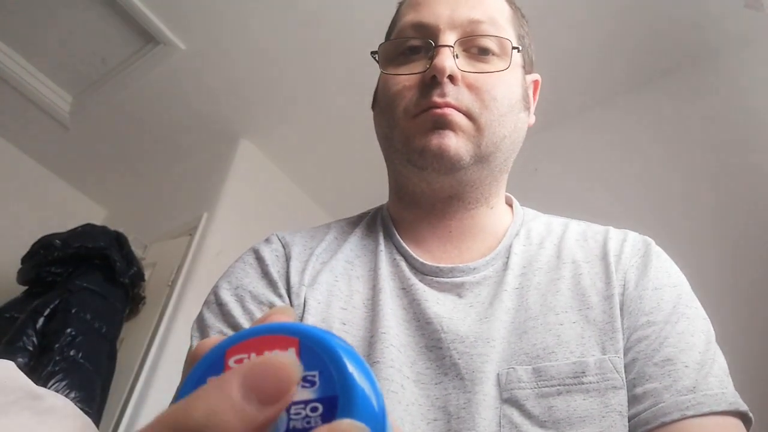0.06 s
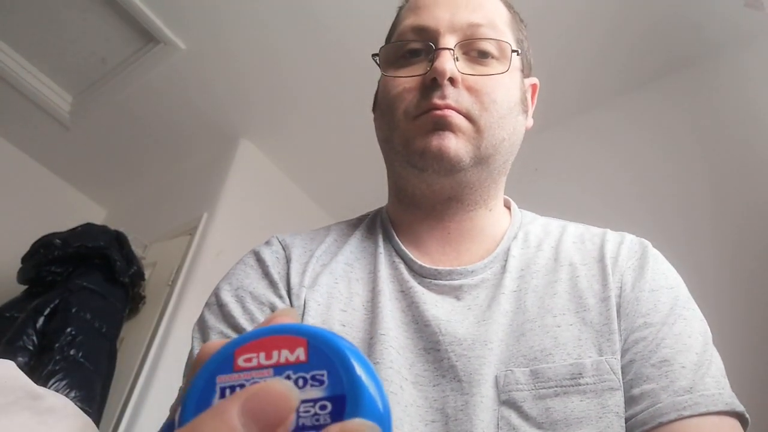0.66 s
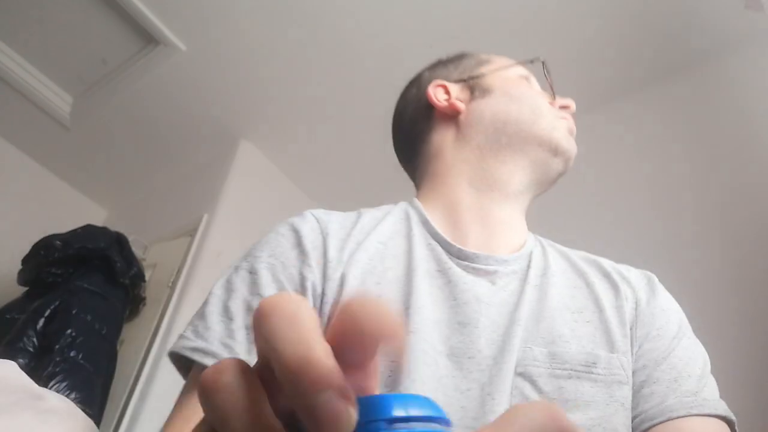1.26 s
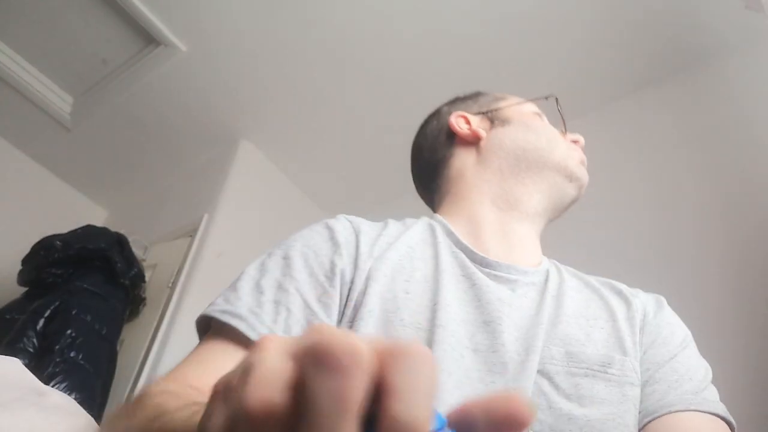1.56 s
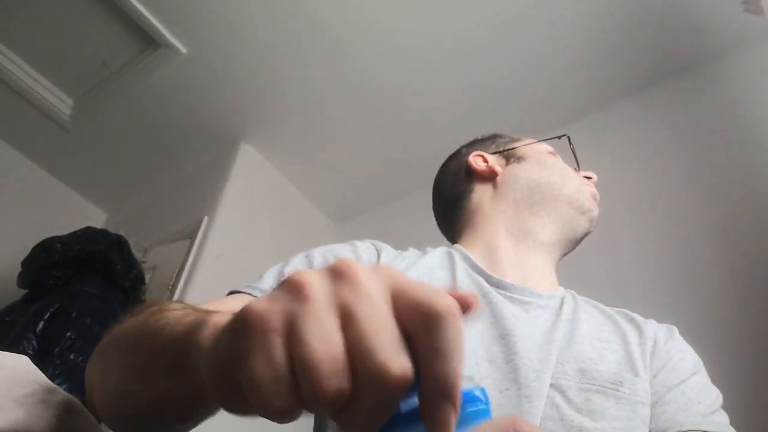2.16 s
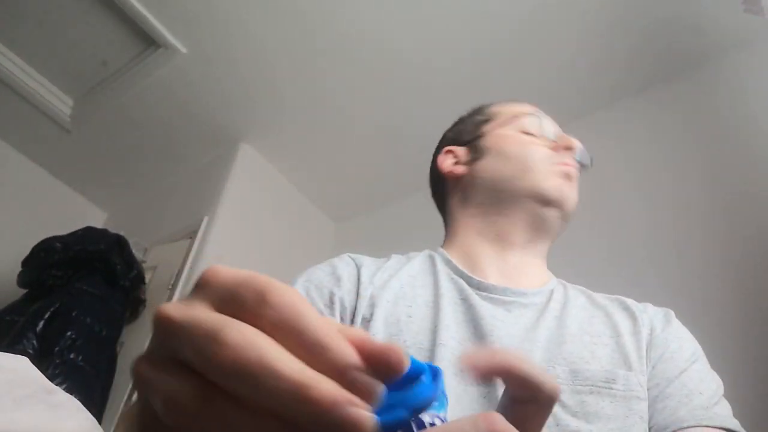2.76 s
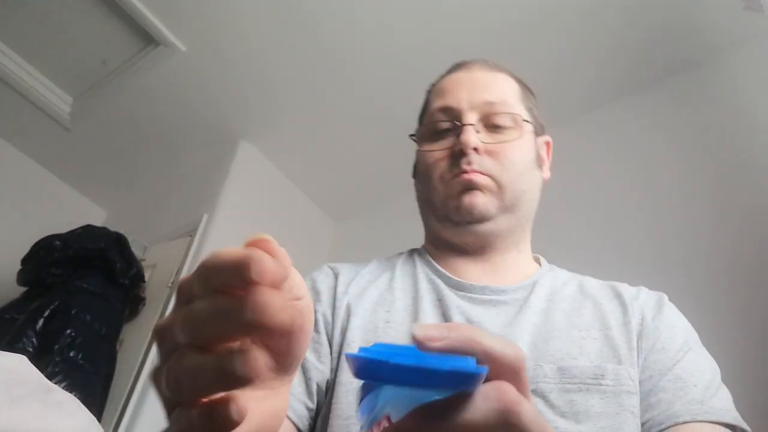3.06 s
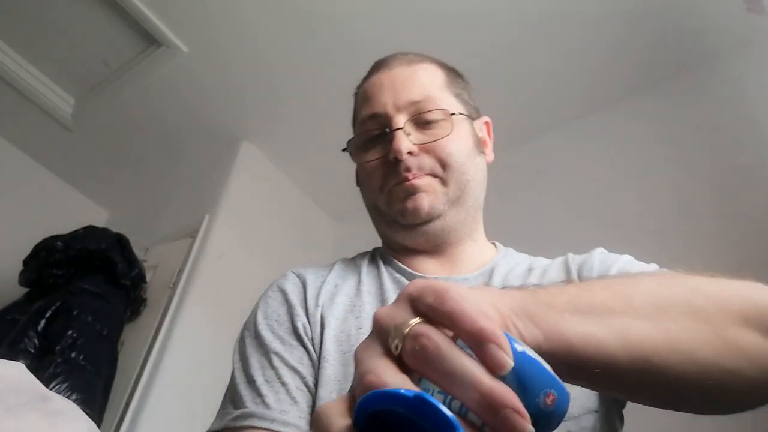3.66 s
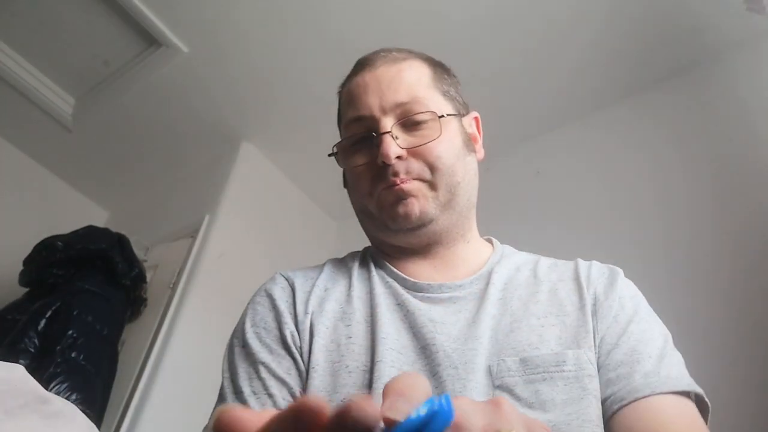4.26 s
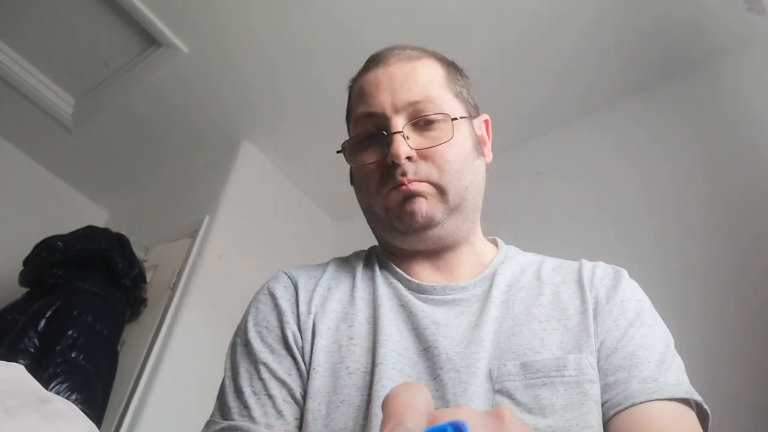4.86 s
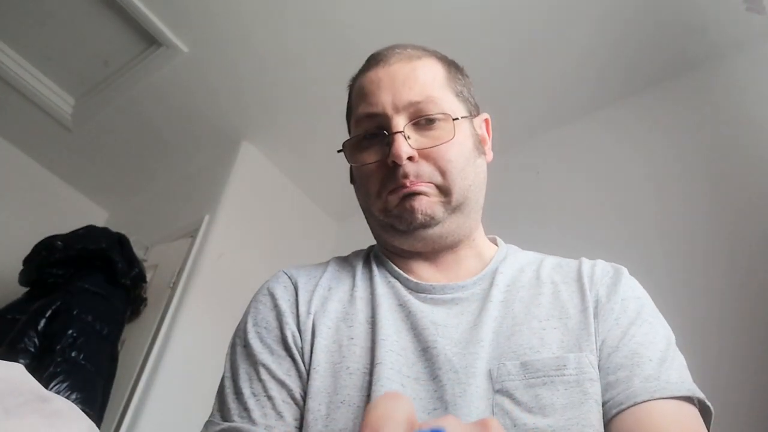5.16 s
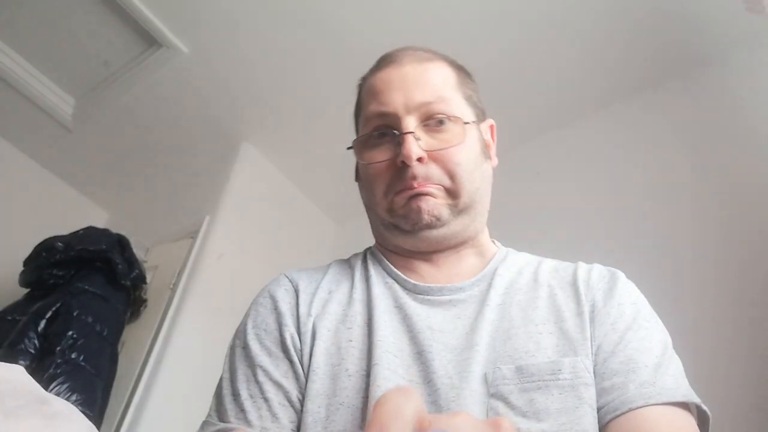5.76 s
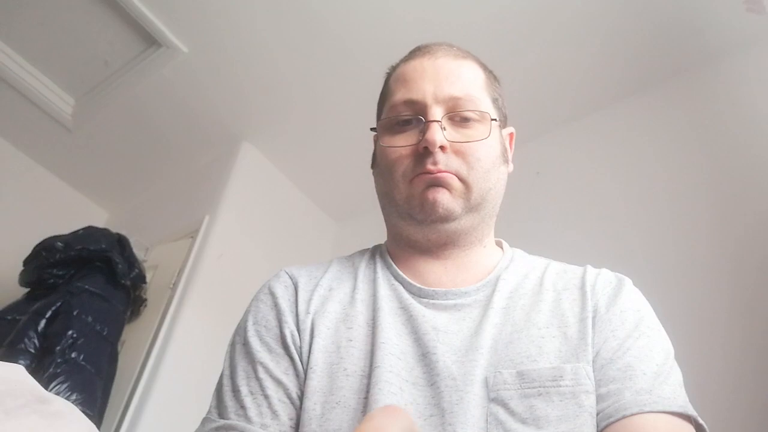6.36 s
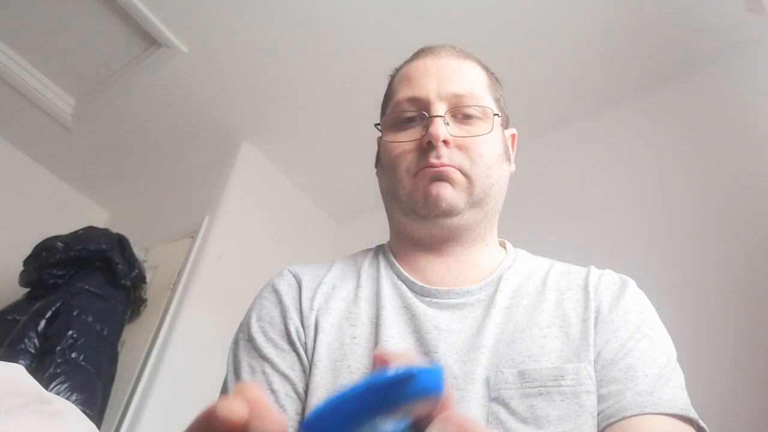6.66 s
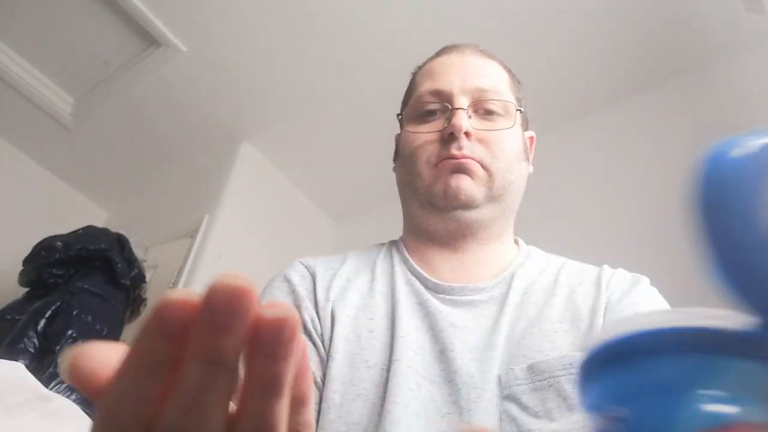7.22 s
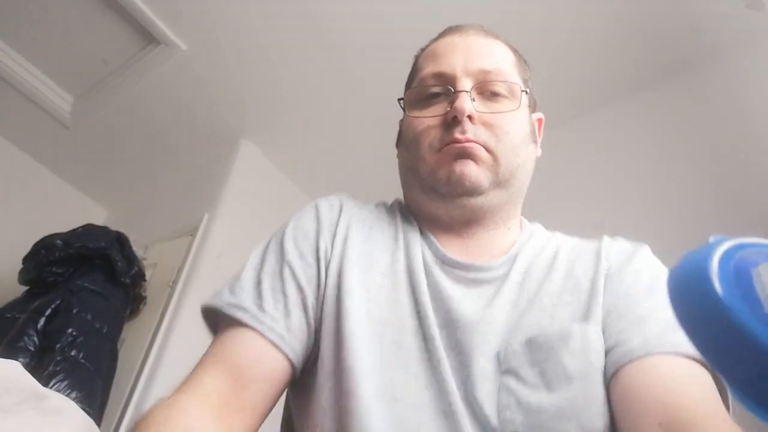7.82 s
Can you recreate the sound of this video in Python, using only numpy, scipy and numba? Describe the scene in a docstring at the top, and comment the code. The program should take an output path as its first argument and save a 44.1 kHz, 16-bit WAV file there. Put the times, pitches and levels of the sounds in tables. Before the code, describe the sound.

A small plastic bottle rustles and clicks in someone's hands, then its lid snaps open with one crisp crack. Soft rubbing and scattered ticks follow as pellets slide toward a palm held over the opening. Near the end they tumble back with a busier, louder, hollow rattle. Everything is heard up close in a quiet room with hardly any echo, over faint hiss and a little sleeve swish.

```python
"""Handling a plastic bottle of pellets

Close to the microphone in a quiet, dry room, fingers scrape over a small bottle and the flip lid pops.
Pellets slide and click as it is tipped against a palm and righted; a sleeve brushes along.
Every touch rings the plastic wall and the air inside, whose pitch drops as the hand covers the mouth."""
import sys
import numpy as np
from scipy import signal
from scipy.fft import rfft, irfft, next_fast_len
from scipy.io import wavfile
from numba import njit

SR = 44100
rng = np.random.default_rng(int(sys.argv[2]) if len(sys.argv) > 2 else 0)


def wav_out(sig):
    """Save sig, one row per channel (or a flat mono array), as 16-bit PCM at SR to the path in sys.argv[1]."""
    wavfile.write(sys.argv[1], SR, np.round(np.clip(np.atleast_2d(sig).T, -1, 1) * 32767).astype(np.int16))


N = 347949
TIME = np.arange(N) / SR
LID_OPEN_S, HALF_COVERED_HZ = 2.1628, 680

# plastic wall: pitch_hz, width_hz, gain_db
WALL_MODES = [(997, 345, 2), (1326, 210, -1), (1740, 640, -1.5), (2020, 230, 1), (2590, 350, 2),
              (3116, 600, 0.5), (3530, 250, -3)]
# bright modes that only hard edges reach: pitch_hz, width_hz, gain_db
EDGE_MODES = [(5140, 910, 2.5), (5890, 310, 0.5), (6454, 230, 4), (7100, 570, 2.5), (8060, 280, -3.5),
              (9400, 560, -13), (13400, 3900, -46)]
# pellet and finger hits, before trim: start_s, air_db, wall_db, wall_tilt_db_per_octave, edge_db
HITS = [(0.177, -69.5, -66.5, -4, -73), (0.5541, -70, -68, -15, -72), (1.0499, -59, -45, 6, -47),
        (1.1367, -41, -32, -16, -39.5), (1.1454, -37.5, -40, -5, -53), (1.3682, -44, -43, 9, -38),
        (1.3838, -50, -36.5, 11, -40), (1.4419, -72, -42.5, -0.5, -43.5), (1.6436, -42.5, -40, 14, -32),
        (2.6889, -53.5, -63.5, 4, -55), (2.8497, -45, -40.5, -4, -46), (2.9539, -62, -56, -1, -45.5),
        (3.0791, -52.5, -49, 11, -44.5), (3.2147, -50, -44.5, 7, -44), (3.2408, -58, -57, 6, -45.5),
        (3.384, -59, -55.5, 5, -55), (3.6704, -56, -55, 14, -36.5), (3.8498, -51.5, -40.5, -3, -50),
        (3.9325, -55, -44, 0, -47.5), (4.226, -44, -36.5, -13, -40.5), (4.3048, -39.5, -34, -22, -47),
        (4.3632, -37, -40.5, -4, -39.5), (4.3832, -36, -32, -6.5, -49), (4.6757, -65, -60, 18, -45),
        (4.941, -52, -49, 6, -44), (5.239, -60, -51, 5, -46.5), (5.312, -65, -47.5, 12, -43),
        (5.6448, -79, -67, 12, -52), (5.8786, -45.5, -45, -0.5, -51), (5.9315, -40, -37, -9, -50),
        (5.9839, -39, -45, 18, -51), (6.1456, -35, -33, -2, -44), (6.1766, -35, -46, 21, -47),
        (6.2091, -37.5, -39.5, 1, -46.5), (6.3154, -54, -47, 0.5, -72), (6.4642, -24, -24, 1, -37),
        (6.5004, -40, -40, -3, -62), (6.6466, -26.5, -30.5, -4.5, -46.5), (6.6676, -35, -35, -3.5, -48),
        (6.7127, -38, -28, -8, -44), (6.8285, -40.5, -35, 0, -48), (6.9191, -49, -43, -8, -58),
        (6.9776, -54, -38, -10, -48), (7.0001, -48, -36.5, -3, -45), (7.0735, -50, -38, -9, -51),
        (7.0087, -37, -32, -8, -44), (7.124, -39.5, -31, -7, -35), (7.1367, -48, -39, -3, -33.5),
        (7.1595, -59, -53, 12, -34.5), (7.1808, -29.5, -21.5, -12, -33), (7.2272, -42, -41, -6, -60),
        (7.2394, -42.5, -36.5, 19, -45), (7.2863, -33, -37, 0.5, -38.5), (7.3831, -43, -37, 25, -35),
        (7.4045, -60, -40.5, 20, -38), (7.8035, -52.5, -47.5, 10, -52), (7.8312, -76, -66, 11, -39)]
def clicks(air_trim_db, wall_trim_db, edge_trim_db):
    """Each hit rings the air inside, the wall and the bright modes; levels refer to its first 6 ms."""
    out = np.zeros((2, N + SR))
    t = np.arange(SR // 12) / SR
    attack = t < .006
    for start_s, air_db, wall_db, tilt_db, edge_db in HITS + finger_ticks():
        hz, width_hz = cavity_mode(start_s + t)
        air = air_ring(1. * (t == 0), hz, width_hz) * np.ones((2, 1))
        wall = strike(WALL_MODES, t, tilt_db, scuff_db=-16.5, scuff_s=0.0012,
                      chatter_db=-34, chatter_s=0.0065, vary_db=5)
        edge = strike(EDGE_MODES, t, 0, scuff_db=-1, scuff_s=0.0018,
                      chatter_db=-14.5, chatter_s=0.0096, vary_db=0)
        layers = ((band(air, 495, 1670), air_db + air_trim_db),
                  (band(wall, 756, 4200), wall_db + wall_trim_db),
                  (band(edge, 3580, 15000), edge_db + edge_trim_db))
        click = sum(from_db(db) * x / np.std(x[:, attack], axis=1)[:, None] for x, db in layers)
        start = int(start_s * SR)
        out[:, start:start + len(t)] += bottle_pan(start_s) * click
    return out[:, :N]


def finger_ticks(rate_per_s=5.9, wall_db=-73, spread_db=3):
    """Gripping fingers tick faintly at random; rows as in HITS."""
    gaps, strengths = rng.random((200, 2)).T
    starts_s = np.cumsum(.3 + 1.4 * gaps) / rate_per_s
    levels_db = wall_db + spread_db * (2 * strengths - 1)
    return [(s, db - 3, db, 0, db - 0.5) for s, db in zip(starts_s, levels_db) if s < N / SR]


def strike(modes, t, tilt_db_per_octave, scuff_db, scuff_s, chatter_db, chatter_s, vary_db):
    """An impulse, a brief scuff and fading chatter drive a set of modes."""
    scuff = from_db(scuff_db) * np.exp(-t / scuff_s)
    chatter = from_db(chatter_db) * np.exp(-t / chatter_s)
    force = rng.standard_normal(len(t)) * (scuff + chatter)
    force[0] = 1
    out = 0
    for hz, width_hz, db in modes:
        tilt_db = tilt_db_per_octave * np.log2(hz / modes[0][0])
        gain = from_db(db + tilt_db + vary_db * rng.standard_normal((2, 1)))
        ring = resonate(force, hz, width_hz) * gain * rng.choice([-1, 1])
        if hz > 1400:   # short waves reach the two sides in any phase
            ring[1] *= rng.choice([-1, 1])
        out = out + ring
    return out


# fineness of the friction: time_s, slips_per_s
SLIP_DENSITY = [(1.2, 980), (1.5, 370), (3.3, 295), (3.62, 2300), (3.82, 1870), (4.0, 650), (6.0, 364),
                (7.0, 740)]
# finger strokes and pellet slides, before trim: peak_s, rise_s, hold_s, air_db, wall_db, edge_db
RUBS = [(1.085, 0.039, 0.016, -48, -43.5, -48), (1.155, .03, 0.054, -44.5, -40, -43.5),
        (1.28, .06, 0.021, -51, -45.5, -56), (1.375, 0.06, 0.033, -50, -45, -50),
        (1.47, 0.07, 0.096, -64, -56.5, -65), (1.647, 0.057, 0.011, -47, -42.5, -49),
        (2.803, 0.023, 0.0064, -69, -62.5, -50), (2.849, 0.022, 0.0074, -44.5, -40, -47),
        (2.92, 0.017, 0.13, -67, -66, -65), (3.078, 0.018, 0.022, -53.5, -53, -55.5),
        (3.235, 0.046, 0.035, -57, -58, -59), (3.44, 0.03, 0.043, -58.5, -52.5, -56),
        (3.512, 0.013, 0.0075, -59, -56.5, -46), (3.64, 0.067, 0.21, -54, -45, -45),
        (3.9, 0.089, 0.17, -65, -59.5, -59), (4.215, 0.074, 0.063, -52, -51, -51.5),
        (4.31, 0.024, 0.084, -42, -47, -49.5), (4.68, 0.061, 0.031, -62, -66, -55),
        (4.94, 0.066, 0.017, -50, -54, -57), (5.19, 0.095, 0.015, -59.5, -63, -53.5),
        (5.25, 0.022, 0.017, -56, -61, -58), (5.31, 0.023, 0.0064, -57.5, -59, -48),
        (5.887, 0.015, 0.1, -52, -53, -54), (6.14, 0.09, .11, -46, -48.5, -53.5),
        (6.475, 0.026, 0.033, -51, -51.5, -53.5), (6.665, 0.14, 0.056, -45, -43, -50),
        (6.77, 0.14, .16, -47.5, -48, -53), (7.005, 0.082, 0.083, -44, -44.5, -48),
        (7.132, 0.021, 0.058, -41, -41, -42), (7.29, 0.016, 0.011, -49, -49, -52),
        (7.388, 0.03, 0.022, -49, -47.5, -46.5)]
def rubbing(air_trim_db, wall_trim_db, edge_trim_db):
    """Fingers and sliding pellets feed a stream of slips into the air, wall and bright modes."""
    air_gain, wall_gain, edge_gain = swells(RUBS, release_s=0.056)
    hz, width_hz = cavity_mode(TIME)
    slips = slip_envelope(curve(SLIP_DENSITY)[0], spread_db=5.5, decay_s=0.00084)
    force = slips * rng.standard_normal(N) * air_gain * from_db(air_trim_db)
    # the second air mode grows as the mouth is uncovered
    overtone_gain = from_db(-12 + 24 * np.log2(hz / HALF_COVERED_HZ))
    rings = air_ring(force, hz, width_hz) + overtone_gain * air_ring(force, 2.38 * hz, 2 * width_hz)
    air = band(rings, 281, 2530) * np.sqrt(4 * np.pi / SR)
    wall = wall_gain * unit_rms(band(rub_modes(WALL_MODES, slips, skin_db=-15.5), 620, 4520))
    edge = edge_gain * unit_rms(band(rub_modes(EDGE_MODES, slips, skin_db=-22.5), 3700, 15500))
    return (air + from_db(wall_trim_db) * wall + from_db(edge_trim_db) * edge) * bottle_pan(TIME)


def rub_modes(modes, slips, skin_db):
    """The same slips reach each mode with a strength of their own, over fine skin friction."""
    out = 0
    for hz, width_hz, db in modes:
        force = (slips + from_db(skin_db)) * rng.standard_normal((2, N))
        correlation = np.clip(1.1 - hz / 2200, 0, 1)   # long waves reach both sides alike
        force[1] = correlation * force[0] + np.sqrt(1 - correlation ** 2) * force[1]
        out = out + from_db(db) * resonate(force, hz, width_hz)
    return out


# air resonance, lower as the hand covers the mouth: time_s, pitch_hz
AIR_PITCH = [(1.7, 820), (2.75, 914), (3.33, 946), (3.44, 826), (3.63, 407), (3.85, 382), (4.0, 473),
             (4.24, 600), (4.34, 667), (4.7, 680), (5.35, 679), (5.88, 749), (6.2, 706), (6.48, 728),
             (6.66, 775), (6.85, 843), (7.2, 905), (7.8, 854)]
def cavity_mode(t, radiation_width_hz=16.6, palm_width_hz=19.7, shut_width_hz=410):
    """Pitch and width of the air mode: an open mouth radiates, a palm absorbs, a shut lid damps most."""
    hz, = curve(AIR_PITCH, t)
    openness = (hz / HALF_COVERED_HZ) ** 4.87
    width_hz = radiation_width_hz * openness + palm_width_hz / openness
    return hz, np.where(t < LID_OPEN_S, shut_width_hz, width_hz)


@njit
def air_ring(force, hz, width_hz):
    """A moving resonance whose output power does not depend on its width."""
    out, state = np.zeros(len(force)), 0j
    for i in range(len(force)):
        pole = np.exp((-width_hz[i] + 2j * hz[i]) * np.pi / SR)
        state = state * pole + force[i] * np.sqrt(width_hz[i])
        out[i] = state.real
    return out


# bottle position: time_s, left_over_right_db
BALANCE = [(0.2, 1), (1.1, -5), (2.9, -4.5), (3.75, -6.5), (4.3, -3.5), (4.9, 3), (6.1, 5.5), (7.1, 3),
           (7.17, 0), (7.4, -3.5), (7.85, -3)]
def bottle_pan(t):
    """Stereo gains follow where the bottle is held."""
    return pan(curve(BALANCE, t)[0])


# lid crack and scrape: frequency_hz, density_db
LID_SPECTRUM = [(200, -20), (400, -12), (620, 4.5), (1100, -3.5), (1700, 1), (2700, -4.5), (3400, -2),
                (4100, -11.5), (5500, -1), (7500, -8), (11000, -20.5), (16000, -27)]
def lid(pulse_s=0.0003, thump_hz=200, flip_s=2.176, rise_s=0.0043, fall_s=0.013):
    """The catch lets go with a push-pull of air, a thump and a crack; the lid scrapes and rings the air."""
    u = np.clip((TIME - LID_OPEN_S) / pulse_s, -20, 20)
    pop = -from_db(-26) * u * np.exp((1 - u * u) / 2)
    age_s = np.maximum(TIME - LID_OPEN_S, 0)
    thump = -from_db(-39.5) * np.sin(2 * np.pi * thump_hz * age_s) * np.exp(-age_s / 0.0094)
    crack = from_db(-28.5) * (TIME > LID_OPEN_S - pulse_s) * np.exp(-age_s / 0.0019)
    flip_fade = np.maximum((flip_s - TIME) / rise_s, (TIME - flip_s) / fall_s)
    flip = from_db(-32.5) * np.exp(-flip_fade) * (TIME > LID_OPEN_S)
    scrape = (crack + flip) * noise(LID_SPECTRUM, correlation=0.29)
    ring = from_db(1) * resonate(scrape.mean(axis=0), hz=758, width_hz=18)
    return (pop + thump + scrape + ring) * pan(left_db=-3)


def palm(start_s=3.558, rise_s=0.0034, pitch_hz=217, level_db=-55.5):
    """The palm seals the mouth with a soft, low bump."""
    u = np.clip((TIME - start_s) / rise_s, 0, 20)
    return from_db(level_db) * u * np.exp(1 - u) * np.sin(2 * np.pi * pitch_hz * (TIME - start_s))


# cloth swish: frequency_hz, density_db
SLEEVE_SPECTRUM = [(1000, -35), (3000, -15), (4200, -18), (5400, -7.5), (6500, -10), (7800, -2),
                   (9500, -19.5), (15000, -26)]
# sleeve strokes: peak_s, rise_s, hold_s, level_db
BRUSHES = [(1.81, 0.075, .02, -64.5), (2.61, 0.41, 0.15, -69), (7.54, 0.064, 0.14, -66.5)]
def sleeve():
    """A sleeve brushes along in swells of grainy hiss."""
    slips = slip_envelope(rate_per_s=160, spread_db=1, decay_s=0.0085)
    return swells(BRUSHES, release_s=0.12) * slips * noise(SLEEVE_SPECTRUM, correlation=0.039)


# low rumble: frequency_hz, density_db
RUMBLE_SPECTRUM = [(12, -0.5), (23, 3.5), (36, -8.5), (50, -4.5), (70, -12.5), (120, -10), (200, -22.5),
                   (350, -29), (900, -63.5)]
# hiss: frequency_hz, density_db
HISS_SPECTRUM = [(200, 4), (700, 4), (1500, 0), (3200, -3), (4000, -8), (5500, -3), (7500, -5),
                 (10000, -10), (13000, -10), (14900, -6), (15900, -13)]
# noise floor: time_s, rumble_db, hiss_db
FLOOR_LEVELS = [(0, -68.5, -79), (2.4, -68.5, -77.5), (4.5, -67, -76.5), (4.62, -59, -73),
                (5.5, -54.5, -70), (6.3, -56, -68.5), (6.8, -59.5, -63.5), (7.4, -62, -64.5),
                (7.6, -54, -64), (7.89, -53.5, -66)]
def background():
    """Faint rumble and hiss, louder in the second half."""
    rumble_db, hiss_db = curve(FLOOR_LEVELS)
    rumble = from_db(rumble_db) * noise(RUMBLE_SPECTRUM, correlation=0.78)
    hiss = from_db(hiss_db) * noise(HISS_SPECTRUM, correlation=0.12)
    return rumble + hiss


def room(x, t60_s=0.12, tail_db=-12):
    """Nearby surfaces add a short, diffuse tail."""
    t = np.arange(SR // 4) / SR
    tail = rng.standard_normal((2, len(t))) * from_db(-60 * t / t60_s) * (t > .005)
    tail = band(tail / np.sqrt(np.sum(tail ** 2) / 2), 600, 10000, order=1)
    return x + from_db(tail_db) * signal.fftconvolve(x, tail, axes=1)[:, :N]


def slip_envelope(rate_per_s, spread_db, decay_s):
    """Tiny decaying slips at random moments, weaker when crowded; rms 1."""
    sizes = from_db(spread_db * np.minimum(rng.exponential(1, N), 3.5))
    energy = (rng.random(N) < rate_per_s / SR) * sizes ** 2 / rate_per_s
    pole = np.exp(-1 / (decay_s * SR))
    return unit_rms(np.sqrt(signal.lfilter([1], [1, -pole], energy + 1e-18)))


def swells(strokes, release_s):
    """Gain per level column: a stroke climbs 20 dB per rise_s, holds, then falls 20 dB per release_s."""
    power = 0
    for peak_s, rise_s, hold_s, *levels_db in strokes:
        fade = np.maximum((peak_s - TIME) / rise_s, (TIME - peak_s - hold_s) / release_s)
        power = power + from_db(levels_db)[:, None] ** 2 * from_db(-20 * np.clip(fade, 0, 10)) ** 2
    return np.sqrt(power)


def noise(spectrum, correlation):
    """Stereo noise of a given spectrum and left-right correlation; rms 1."""
    hz, db = np.transpose(spectrum)
    size = next_fast_len(N)
    bins_hz = np.arange(size // 2 + 1) * SR / size
    gain = from_db(np.interp(np.log(bins_hz + 1), np.log(hz), db))
    mid, side = irfft(rfft(rng.standard_normal((2, size))) * gain, size)[:, :N]
    return unit_rms(np.sqrt(1 + correlation) * mid + np.sqrt(1 - correlation) * side * [[1], [-1]])


def resonate(x, hz, width_hz):
    """Two-pole resonance, peak gain 1."""
    r = np.exp(-np.pi * width_hz / SR)
    feedback = [1, -2 * r * np.cos(2 * np.pi * hz / SR), r * r]
    return (1 - r * r) / 2 * signal.lfilter([1, 0, -1], feedback, x + 1e-18)


def band(x, low_hz, high_hz, order=3):
    """Band-pass: small things radiate little bass, blunt contacts little treble."""
    return signal.sosfilt(signal.butter(order, [low_hz, high_hz], "band", fs=SR, output="sos"), x)


def pan(left_db):
    """Constant-power left and right gains."""
    gains = from_db(np.array([[.5], [-.5]]) * left_db)
    return gains / np.sqrt(np.mean(gains ** 2, axis=0))


def curve(rows, t=TIME):
    """Each value column interpolated at times t."""
    times_s, *columns = np.transpose(rows)
    return [np.interp(t, times_s, column) for column in columns]


def from_db(db):
    return 10 ** (np.asarray(db) / 20)


def unit_rms(x):
    return x / np.sqrt(np.mean(x ** 2) + 1e-20)


def scene():
    """Bottle, lid and palm in the room, over the sleeve and the background."""
    bottle = clicks(air_trim_db=-2.5, wall_trim_db=-2, edge_trim_db=-2.5)
    bottle += rubbing(air_trim_db=-2, wall_trim_db=-1.84, edge_trim_db=-0.64)
    bottle += lid() + palm()
    bed = sleeve() + background()
    return room(bottle) + bed


def record(dry, left_lag_s=.00011, cutoff_hz=15750):
    """The left microphone port lies a little farther from the hands; the top is cut steeply."""
    ports = np.array([np.roll(dry[0], round(left_lag_s * SR)), dry[1]])
    return signal.sosfilt(signal.ellip(10, .1, 80, cutoff_hz, fs=SR, output="sos"), ports)


dry = scene()
out = record(dry)
wav_out(out)
```